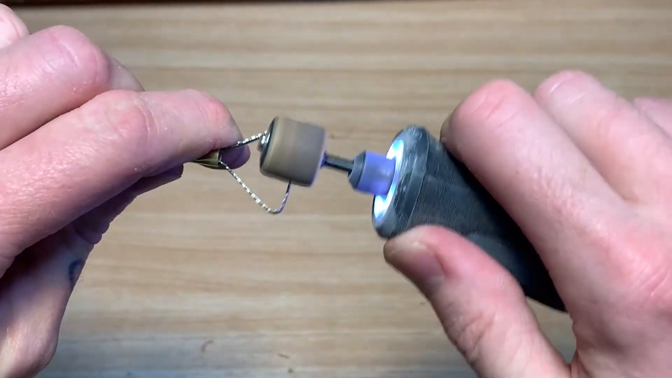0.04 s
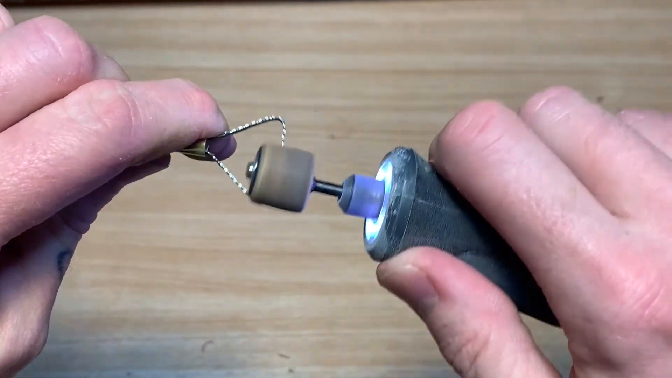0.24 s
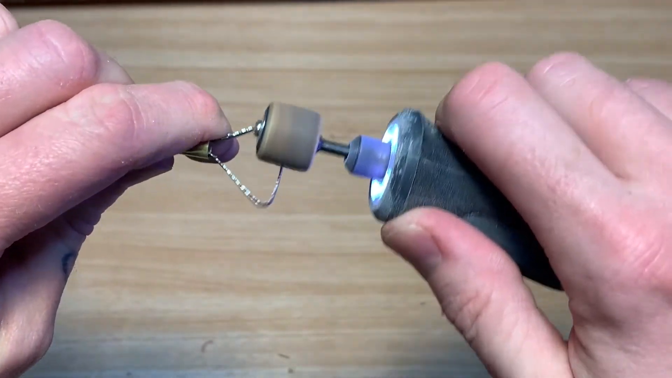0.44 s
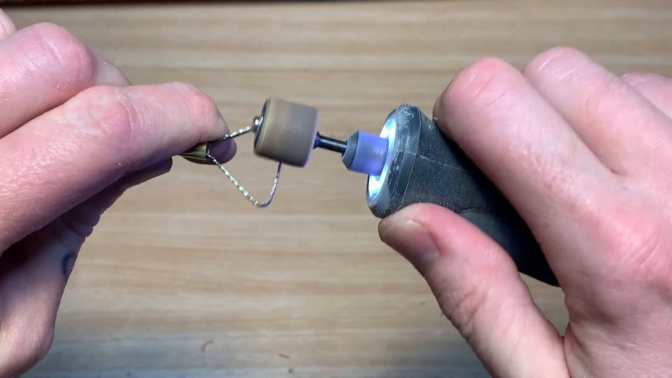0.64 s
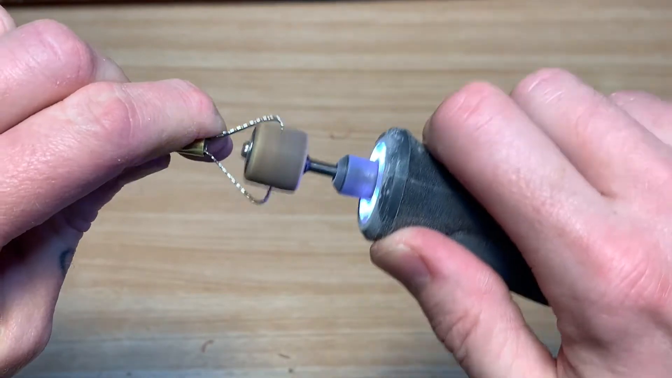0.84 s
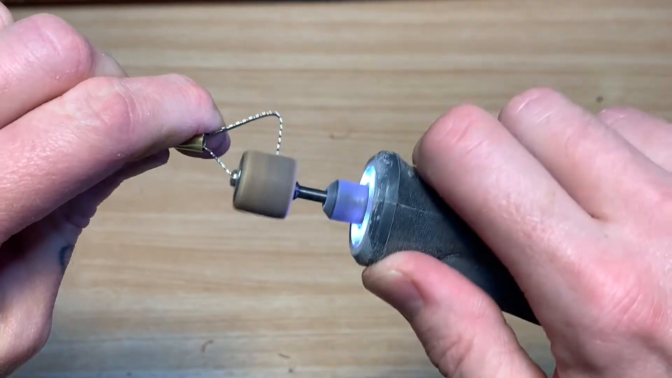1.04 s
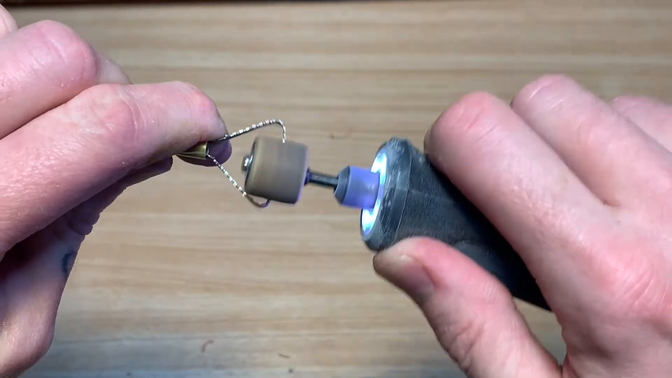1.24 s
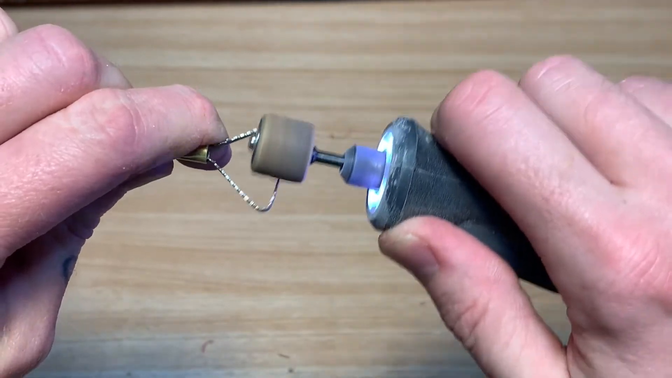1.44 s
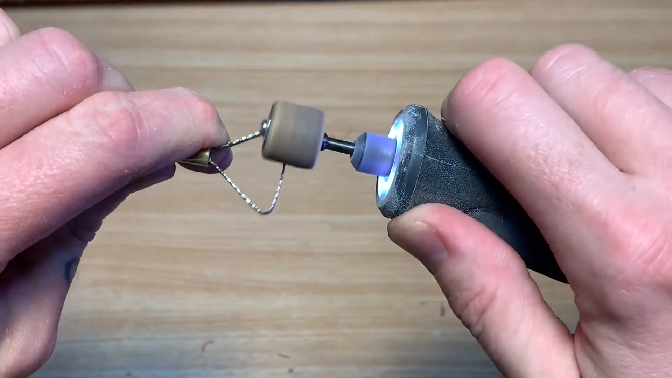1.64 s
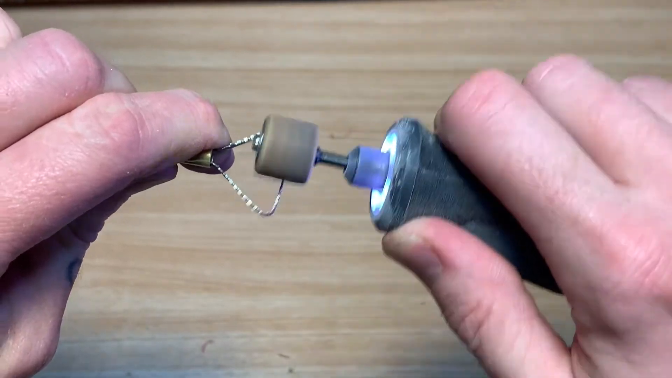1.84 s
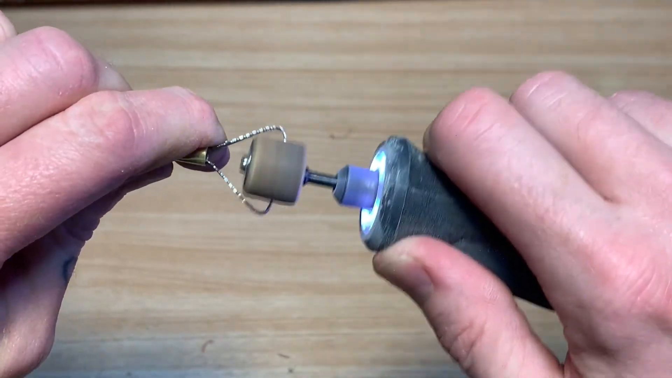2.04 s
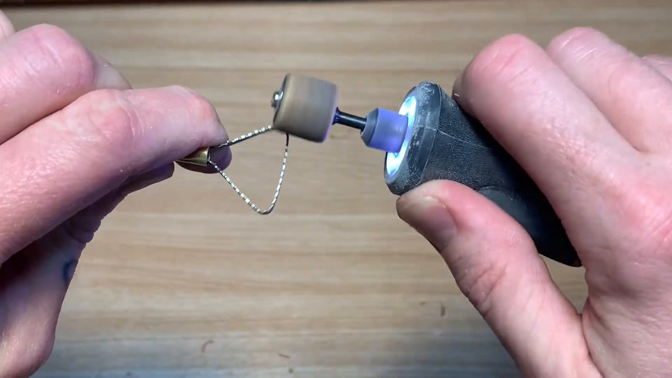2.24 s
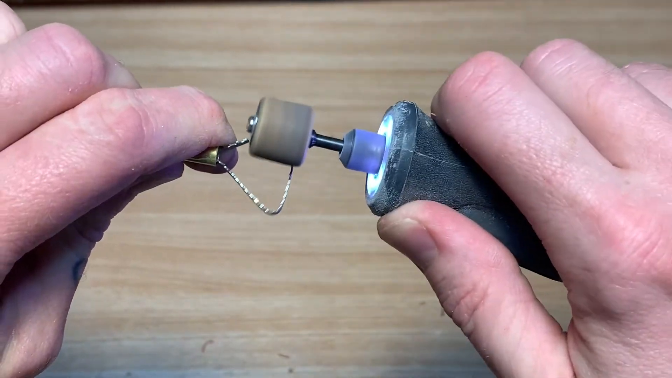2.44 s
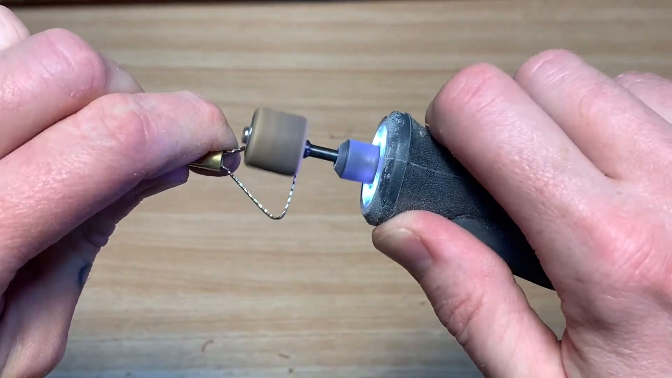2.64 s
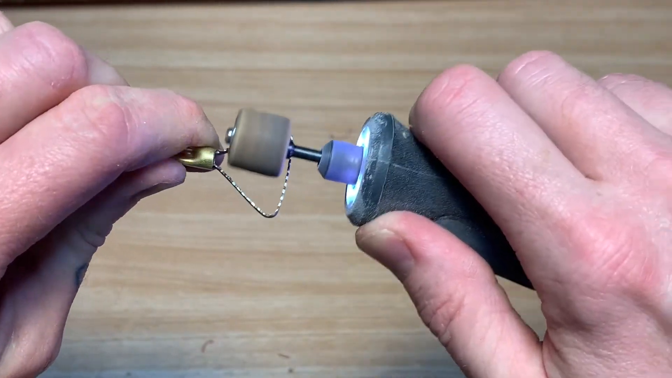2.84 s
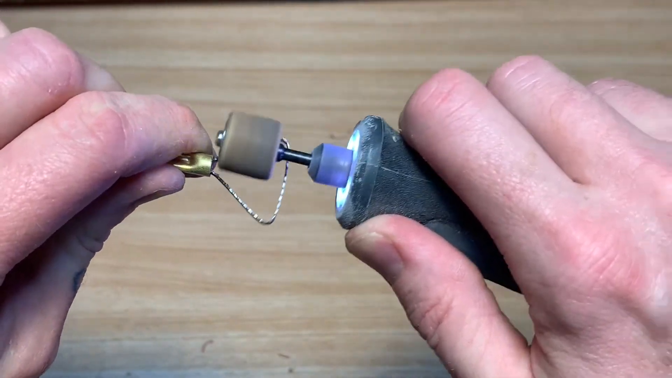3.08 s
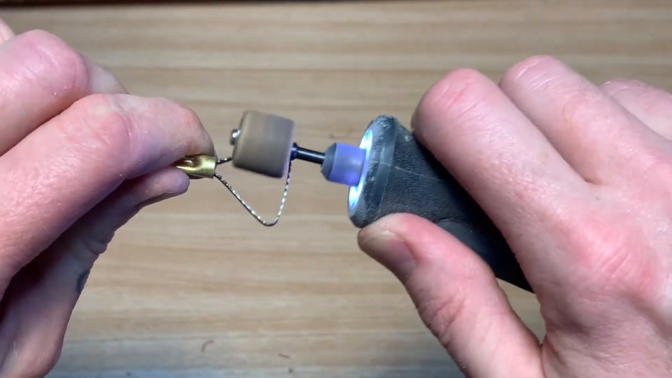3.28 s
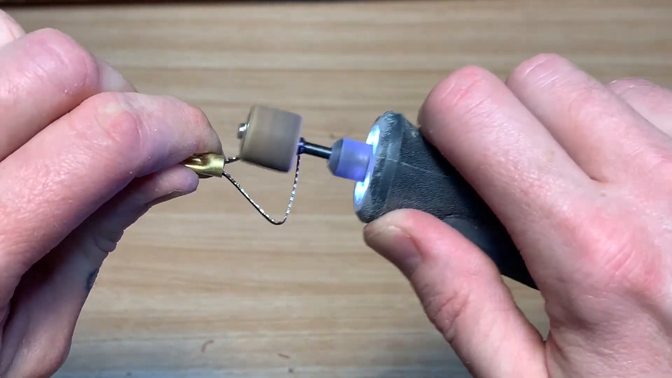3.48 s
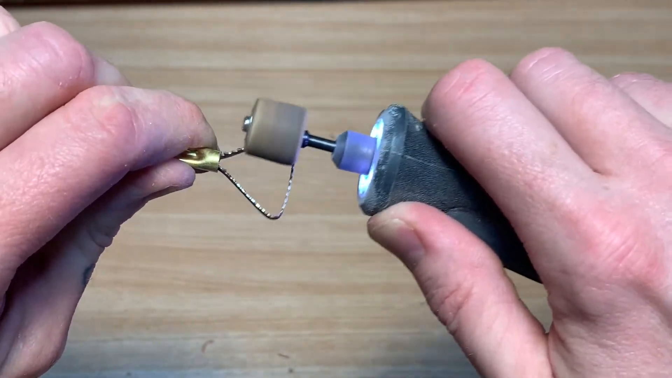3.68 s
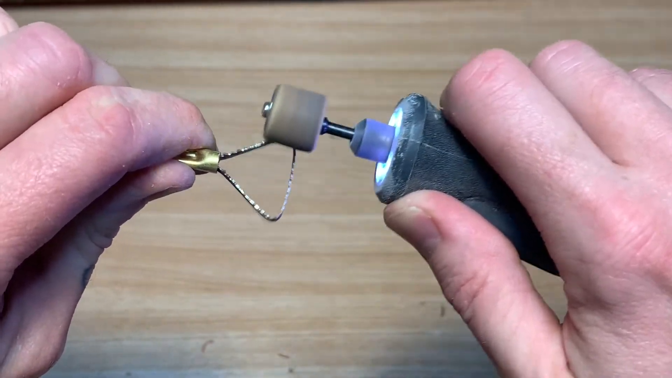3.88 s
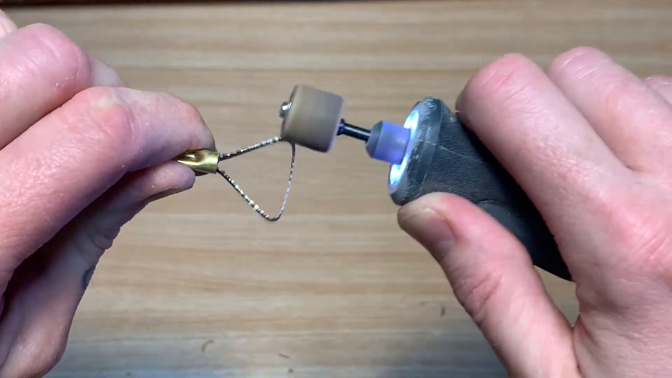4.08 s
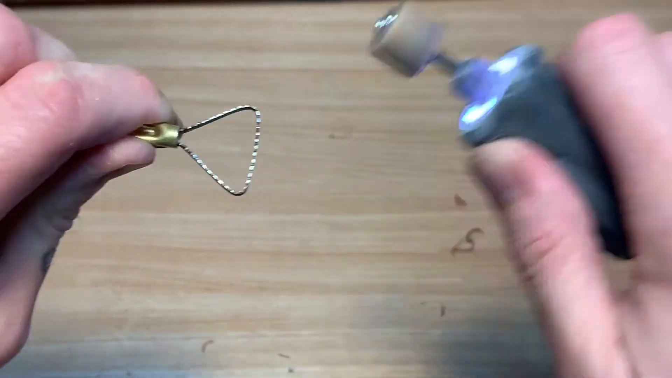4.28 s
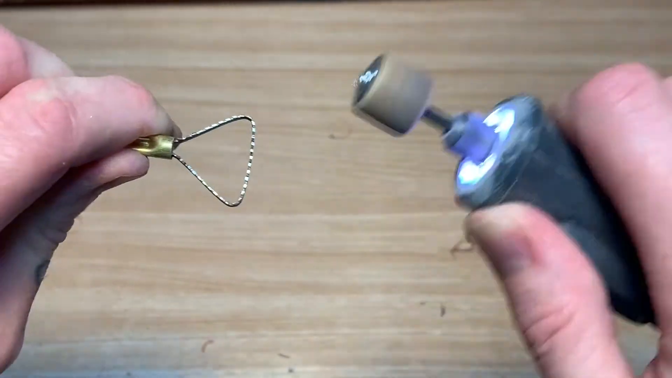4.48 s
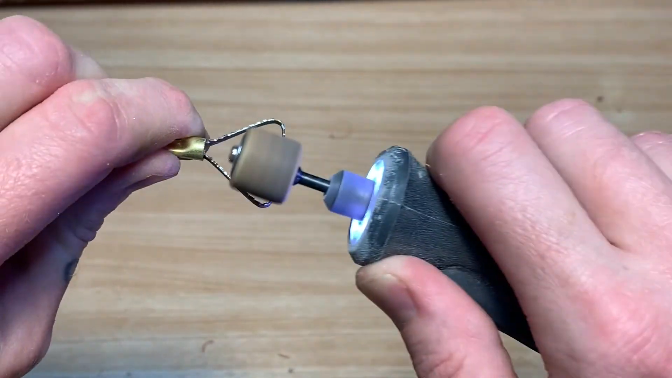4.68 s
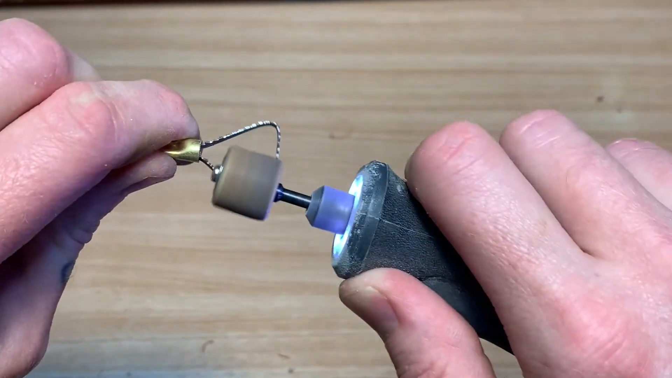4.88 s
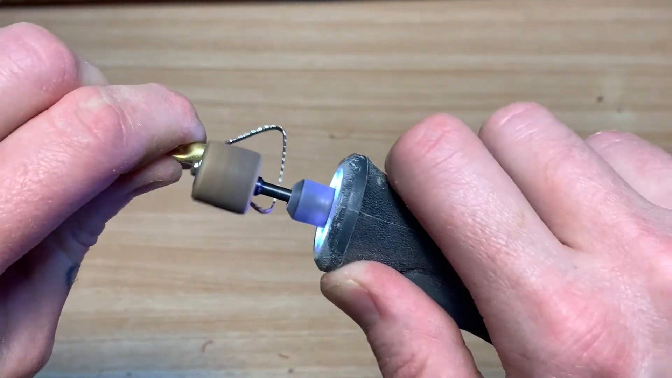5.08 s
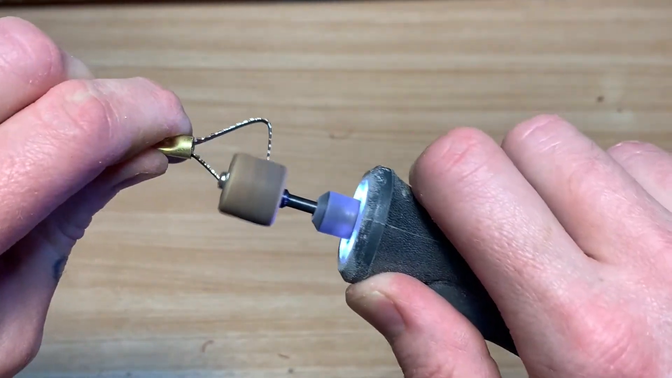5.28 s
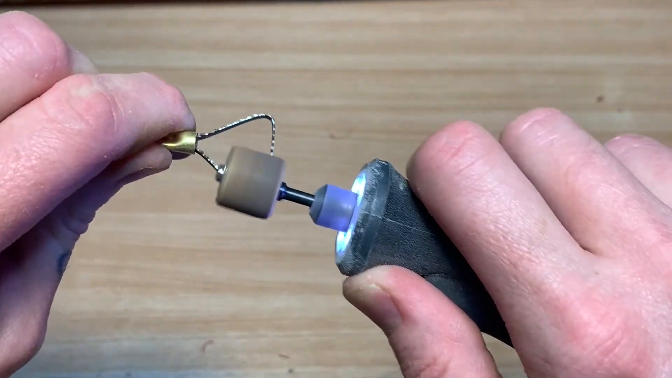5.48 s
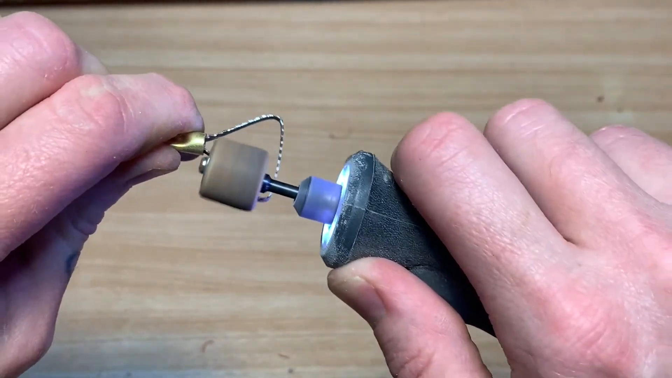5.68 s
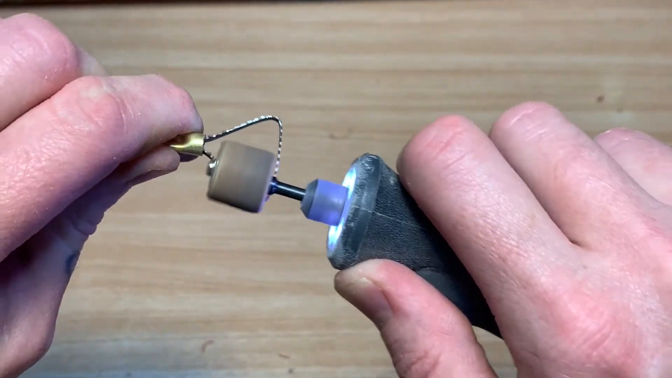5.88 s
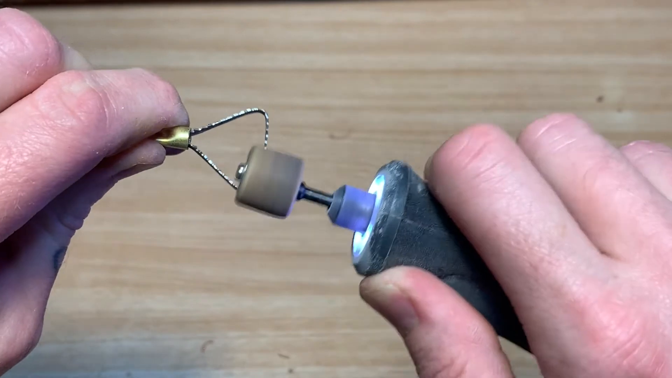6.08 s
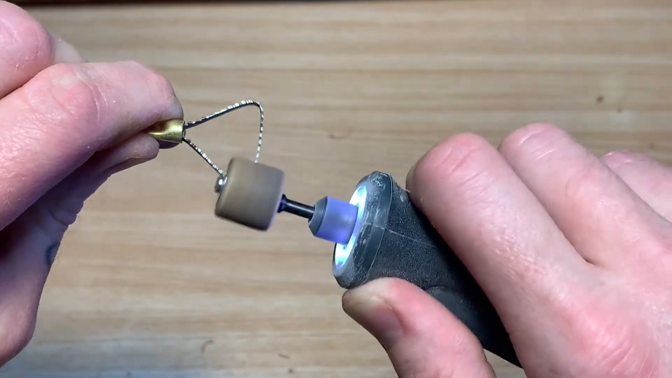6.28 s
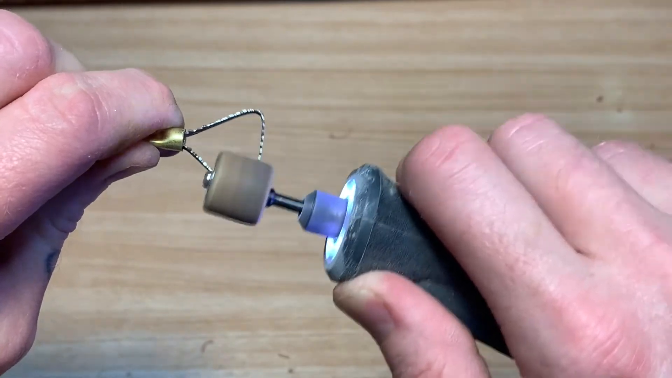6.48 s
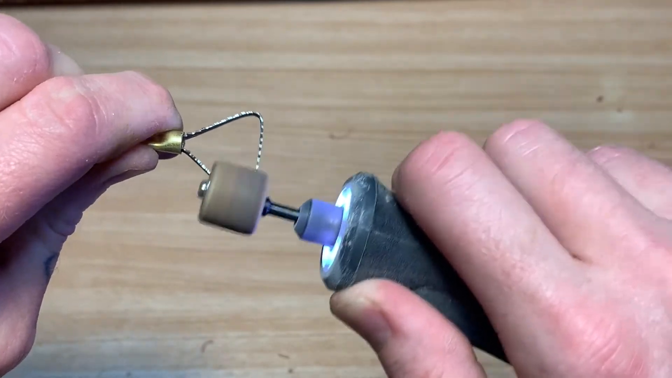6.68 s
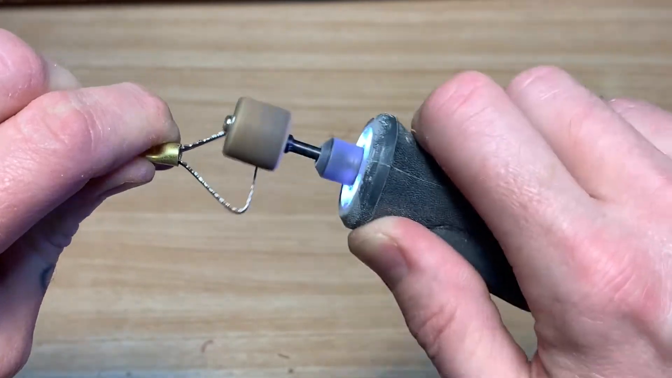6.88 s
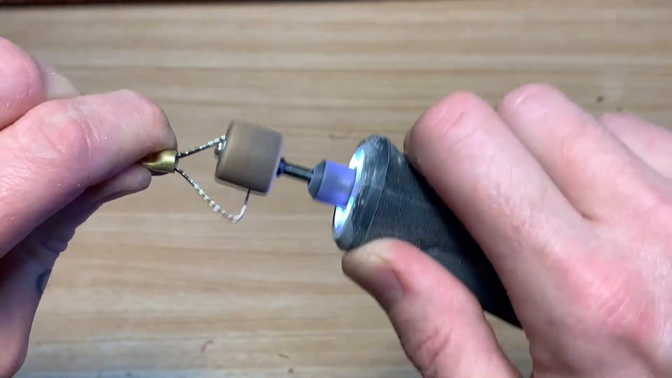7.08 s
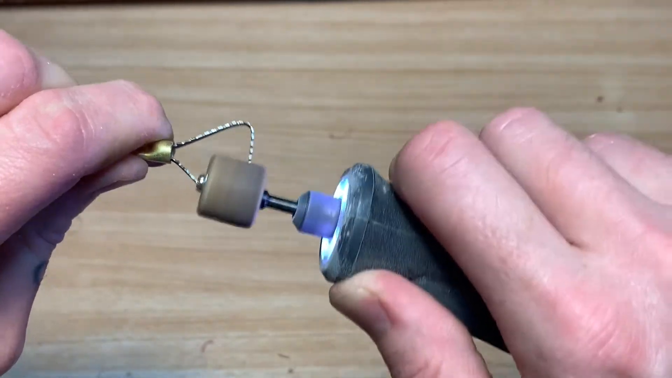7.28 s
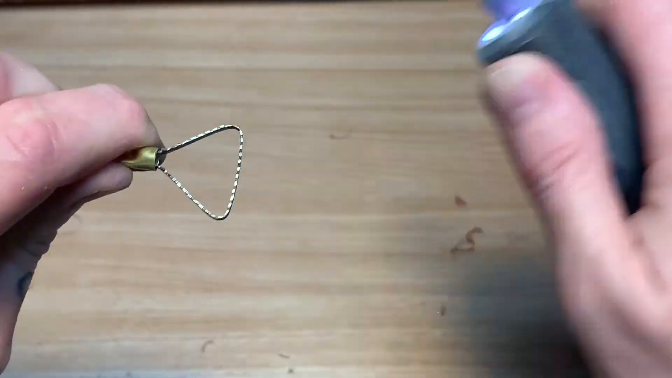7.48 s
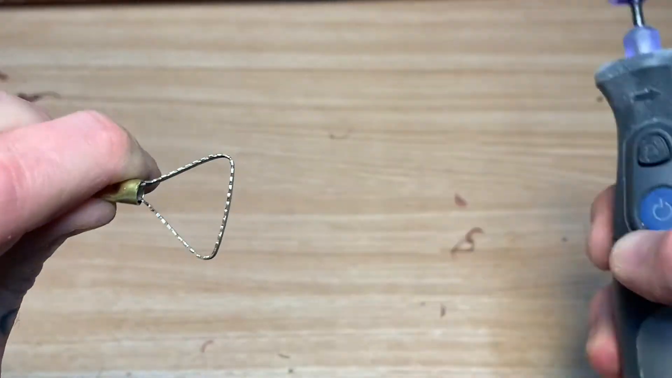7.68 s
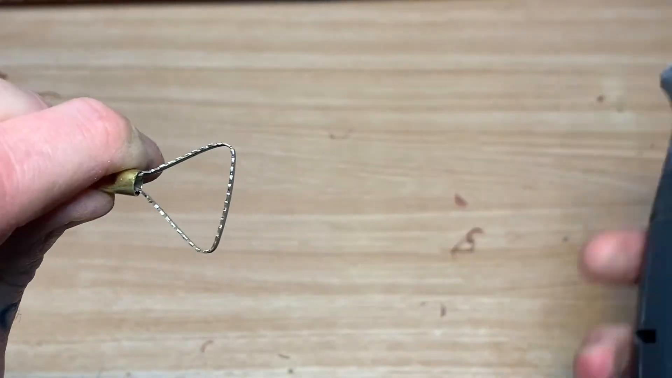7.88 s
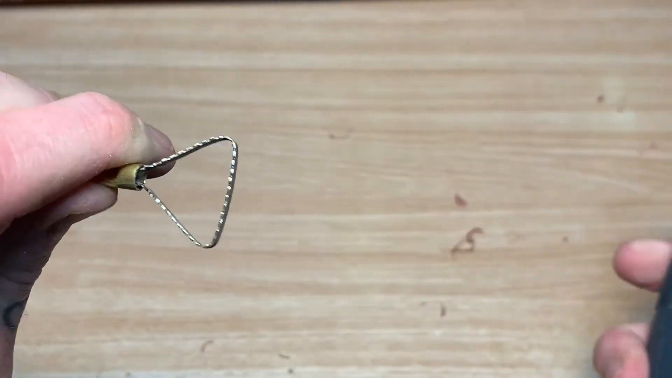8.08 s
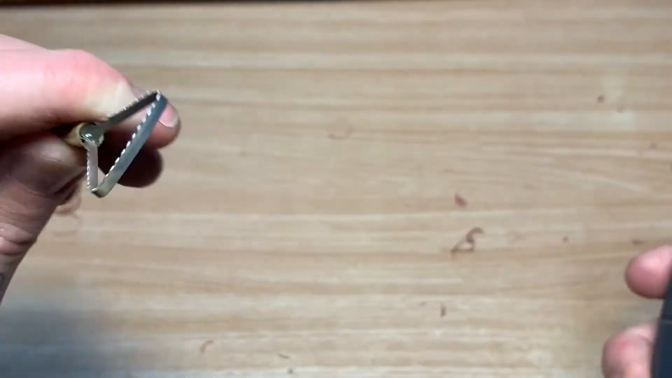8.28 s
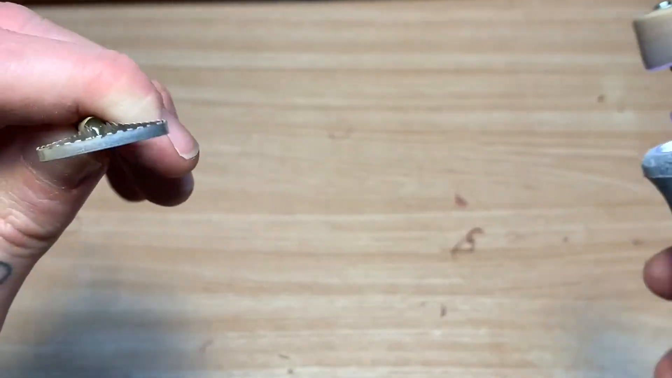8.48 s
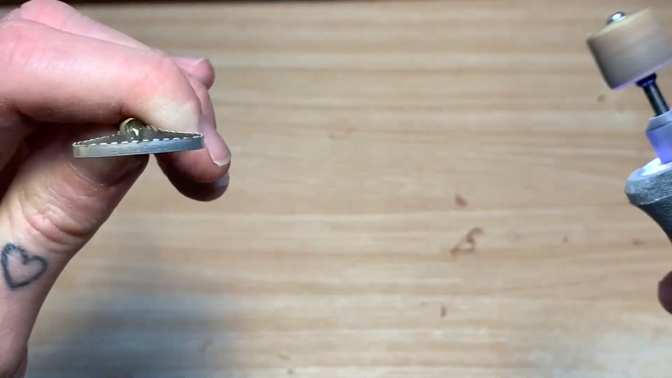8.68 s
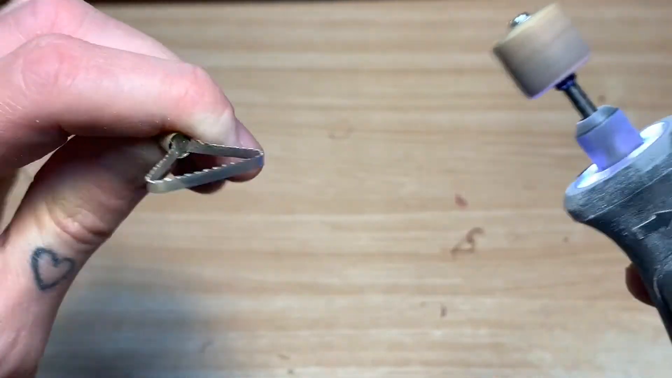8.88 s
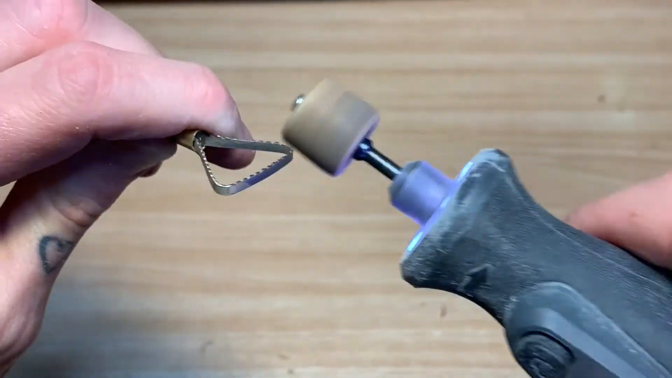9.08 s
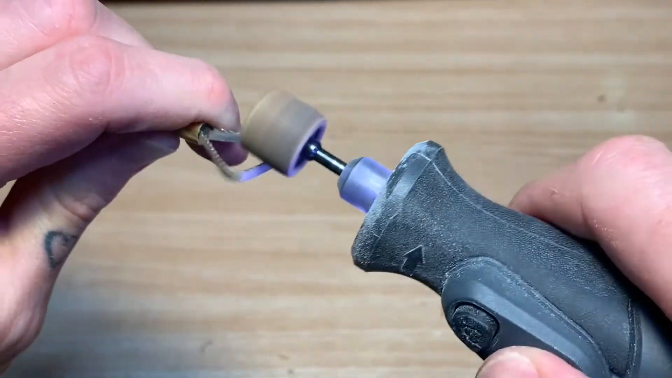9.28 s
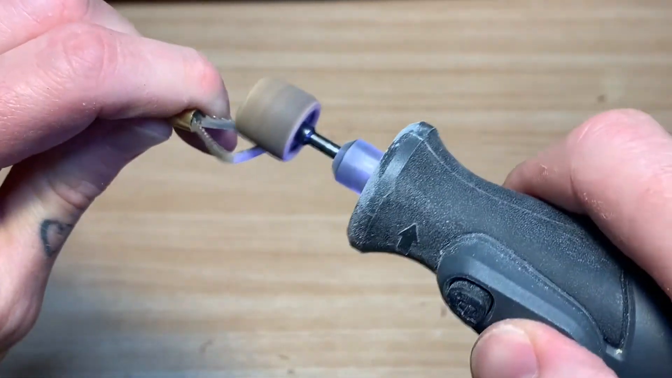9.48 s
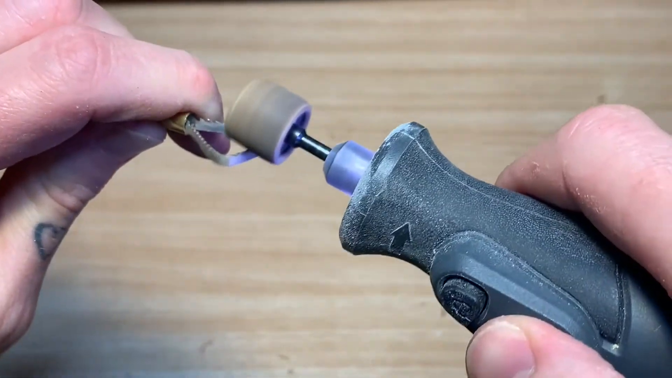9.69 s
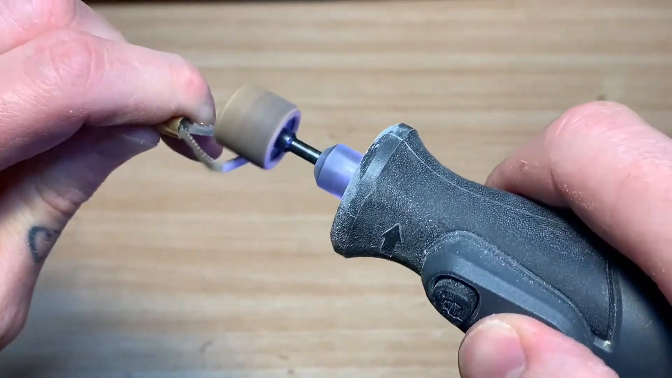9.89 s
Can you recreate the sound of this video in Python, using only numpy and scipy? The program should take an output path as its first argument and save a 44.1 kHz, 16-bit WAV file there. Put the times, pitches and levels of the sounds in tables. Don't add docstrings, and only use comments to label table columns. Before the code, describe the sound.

A small rotary tool whines and grinds a thin metal wire, bright and raspy, its pitch sagging under load and rising when lifted off.

```python
import sys
import numpy as np
from scipy import signal
from scipy.fft import rfft, irfft, next_fast_len
from scipy.io import wavfile
from scipy.ndimage import uniform_filter1d, map_coordinates

SR = 44100
rng = np.random.default_rng(int(sys.argv[2]) if len(sys.argv) > 2 else 0)


def put_to_file(sound):
    columns = np.atleast_2d(sound).T
    safe = np.clip(columns, -1, 1)
    whole_steps = np.round(safe * 32767)
    wavfile.write(sys.argv[1], SR, whole_steps.astype(np.int16))


def attenuation_scalar(level_db):
    decades = np.asarray(level_db, float) / 20
    return 10 ** decades


N = 438354

# [f/Hz, level/dB per Hz]
RUMBLE = [(13, -43), (22, 10), (54, 25), (107, 15.5), (157, 13), (238, 7), (309, 10), (371, 2.5),
          (420, 17.5), (550, -8), (920, -120)]
# [t/s, level/dB]
SWELLS = [(.05, 16), (.44, 17.5), (.85, 14.5), (1.5, 12.5), (2.11, 10.5), (2.45, 9.5), (2.7, 17),
          (3.12, 10), (4.12, 9), (4.57, 5), (5.33, 9), (5.9, 7), (6.2, 6), (6.799, 6), (7.95, 7), (8.35, 6),
          (8.55, 6), (8.89, 15), (9.2, 11.5), (9.48, 13)]
CALM_DB, SWELL_S = -67, 0.099
# [t/s, level/dB]
KNOCKS = [
    (0.19, -40),
    (2.701, -46),
    (7.901, -47),
    (8.299, -48),
    (8.847, -59),
    (9.498, -58),
]

# [t/s, goal/turns per s, lag/s]
LOADS = [(0, 146, .2), (.5, 140, .3), (2.1, 184, .13), (2.37, 156, .06), (3.302, 151, .3),
         (4.1, 145, 0.0486), (4.17, 154, 0.03004), (4.245, 208, .2), (4.805, 160, .04), (5.12, 156, .1),
         (6.07, 190, .12), (6.23, 157, .05), (6.9, 149, .3), (7.37, 212.2, .2), (9.266, 152, .115)]
START_TURNS, QUICK_SHARE, QUICK_S = 165, .22, 0.02964
# [t/s, gain/turns per s]
SURGES = [(0.031, -4), (0.202, -2.5), (0.418, 3.5), (.59, -5), (.68, 3.5), (.82, -7), (.93, 2), (1.06, -4),
          (1.201, 2), (1.3, -2), (1.452, 5), (1.579, -4), (1.69, 5), (1.8, -3), (1.929, 7), (2.201, -4),
          (2.52, -3), (2.798, 3), (2.95, -3.5), (3.041, 3), (3.152, -7), (3.3, -2.5), (3.558, -8),
          (3.772, -6), (4.138, 5.5), (5.199, -8), (5.5, -5), (5.62, 3), (5.801, -5), (6.149, -7.5),
          (6.271, 5), (6.439, 7), (6.55, -3), (6.649, 5.5), (6.768, -8), (7.06, -2.5), (7.17, 4.5),
          (7.3, -4.5), (7.5, -3), (9.412, 9), (9.672, -5), (9.76, 4)]
SURGE_S = .04
# [t/s, extra shudder level/dB]
ROCKS = [(0.036, 6), (.31, 4), (0.451, 4), (0.682, 3.5), (.95, 4), (1.22, 5.5), (1.578, 4), (1.71, 4),
         (1.85, 2), (2.0, 2), (2.652, 4), (2.858, 8), (3.092, 10), (3.3, 10.5), (3.532, 8.5), (3.728, 8.5),
         (3.98, 10), (4.11, 14), (5.081, 4), (5.39, 4.5), (5.6, 3), (5.88, 2.5), (6.62, 2.5), (6.93, 2),
         (9.332, 3), (9.579, 3.5)]
ROCK_S, ROCK_TURNS, ROCK_WHINE = .035, .3, 0.73

# [t/s, brush and whine level/dB, first order level/dB, shell ring level/dB, #
# loaded handle hum level/dB]
MOTOR = [(0, -47.5, -55, 9, -4.5), (1, -51, -55.5, 6.5, -7), (2.05, -51, -58, 5, -2.5),
         (2.3, -48, -68, 5, -6.5), (2.6, -48, -59.5, 8.5, -2.5), (4.1, -52.5, -62, 6, -9),
         (4.3, -49.5, -64, 9.5, -6.5), (4.5, -50, -57, 6, -2.5), (4.79, -49, -58, 19, -2.5),
         (4.9, -52, -64.5, -1.5, -14.5), (5.8, -57, -64.5, 2.5, -5), (6.2, -52, -70.5, 0, -7),
         (7.3, -52, -60.5, 11, -8.5), (7.75, -51, -52, 4, -11), (8.05, -48.5, -55.5, 33, -3),
         (8.6, -48, -48.5, 1.5, -2.5), (9.24, -45.5, -46, 20, -1), (9.5, -45, -72, 17, -7)]
# [t/s, centre f/Hz, lift level/dB, top orders level/dB]
HOUSING = [(0, 1770, 1.5, 8), (4.2, 2380, -2.5, 4.5), (4.4, 2700, 6, 4.5), (4.8, 2500, 2, 2.5),
           (5, 1900, 7.5, -3), (7.4, 960, -5.5, 7), (7.58, 2580, 4, 1.5), (7.8, 2000, 15, -7),
           (7.97, 2340, 8, -2), (8.28, 2360, 9.5, -1), (8.45, 1920, 3, 1), (8.9, 1900, 3, -11),
           (9.22, 1810, 2, -16), (9.4, 1730, -19, -3), (9.94, 1770, -13, -5)]
# [f/Hz, level/dB per Hz]
AIRFLOW = [(250, -15.3), (500, -17.3), (1000, -8.2), (1700, -5.2), (2600, -3.5), (4000, -5.2), (5500, -9.1),
           (7500, -0.5), (10000, -3.0), (13000, -5.5), (15500, -10.5)]
# [multiple of shaft speed, level/dB]
BEARING = [(3.5, -32), (4.5, -16.5), (7.5, -22), (11.5, -19), (13.5, -17), (15.5, -18)]
# [multiple of shaft speed, level/dB]
FREE_ORDERS = [(4, -11.5), (5, -3), (6, -4), (7, -1), (8, -10), (9, -6.0), (10, -6.5), (11, -4.5),
               (12, -21), (13, -3.5), (14, -2.5), (15, -3), (16, -13), (17, -5), (18, -20), (19, -15),
               (20, -18.5), (21, -17), (22, -14)]
# [multiple of shaft speed, level/dB]
LOADED_ORDERS = [(4, -16), (5, -16.5), (6, -20), (7, -16.5), (8, -18), (9, -6), (10, -16.5), (11, -8.5),
                 (12, -12.5), (13, -15), (14, -8)]
# [multiple, t/s, level/dB, half width/s]
BEAMS = [(5, 2.22, 6, 0.02), (5, 2.33, 3.5, 0.035), (4, 2.54, -9, .1), (11, 2.56, -8, .08),
         (10, 4.35, 3, .05), (12, 4.4, 8, .06), (11, 4.45, 6, .1), (16, 4.41, 10, .04),
         (6, 4.47, -18, 0.093), (4, 4.5, 7.5, 0.12), (9, 4.4, 4.5, .15), (14, 4.6, -10, .1),
         (17, 4.66, 4, 0.083), (15, 4.66, 3, 0.11), (18, 4.71, 4, .05), (10, 4.72, -12, .05),
         (5, 4.72, 2, .08), (5, 6.2, 2, 0.09), (5, 6.8, 9, .08), (10, 7.44, 12, .04), (13, 6.2, 6, .05),
         (2, 7.58, 12, .1), (5, 7.62, 3.5, 0.041), (4, 7.65, 13, 0.089), (9, 7.66, 7, 0.057),
         (11, 6.8, -12, 0.053), (13, 7.65, -11, .06), (3, 7.75, -7, 0.13), (5, 7.77, 8, 0.028),
         (8, 7.85, 0, 0.033), (5, 8, 8, 0.091), (11, 8.05, 6.5, 0.12), (10, 8.2, 12, 0.11),
         (12, 8.25, 17, .08), (9, 7.3, -12, 0.089), (5, 8.25, -18, 0.092), (15, 8.25, -8, .08),
         (17, 8.25, -4, 0.071), (7, 8.45, 5, 0.086), (20, 8.5, 6, .12), (6, 8.55, 10, 0.2),
         (9, 8.65, -8, .1), (11, 8.85, 6.5, 0.05), (9, 9.8, 8, .05), (13, 8.9, -12, 0.13),
         (20, 8.85, 11, 0.055), (8, 8.95, 2, 0.13), (17, 8.95, 5, .12), (4, 9.9, 5.5, 0.13)]
SECOND_DB, THIRD_DB = (-9.5, -6.5), (-1.5, 6)
TOP_ORDERS_HZ = 2894
PULSE_SPREAD = 1.5
WAVER_DB, DRIFT_DB, FLUTTER_DB = 2.5, 1.5, .13
LOADED_AIR_DB = -1
HANDLE_HZ, HANDLE_WIDTH_HZ, HANDLE_DB = 370, 140, 11.5
BRAKING = 150
COLLET_HZ, COLLET_WIDTH_HZ, COLLET_DB = 857, 92, 10
SHELL_HZ, SHELL_WIDTH_HZ = 1763, 96
SHELL_LAG, SHELL_LEAN_DB = 5.2, 2

# [start t/s, end t/s]
TOUCH_S = [
    (0, 2.242),
    (2.242, 2.637),
    (2.637, 4.238),
    (4.802, 4.806),
    (4.806, 6.216),
    (6.216, 7.385),
    (9.266, 10),
]
# [level/dB at start, level/dB at end]
TOUCH_DB = [(-22, -25.5), (-30, -30), (-24, -23), (-33, -38), (-26.5, -23), (-32.5, -28), (-28, -26.5)]
# [t/s, level/dB, half width/s]
PUSHES = [(.04, 0.5, 0.028), (.33, 2, 0.019), (1.05, 3, 0.016), (2.555, 5.5, 0.037), (2.72, -1, .02),
          (2.78, 2, 0.032), (.52, 1.5, 0.071), (1.3, 1.2, 0.032), (1.55, 1, 0.043), (3.33, 0.5, 0.017),
          (3.55, 0.5, .02), (3.8, 2, 0.029), (5.1, 1, .03), (5.98, 2, 0.032), (6.6, -1, 0.028),
          (6.83, -1, 0.036), (9.28, 0.5, 0.0055), (9.5, -1, .04), (9.76, 0.5, 0.034), (9.93, 1, 0.02),
          (6.385, -0.5, 0.035), (3.1, 3, 0.089), (4.05, -6, 0.0053), (4.14, 9.5, 0.015), (4.21, -5.5, 0.12),
          (4.83, 10.5, 0.046), (4.965, 3.5, 0.0067), (5.17, 4.5, 0.036), (5.34, 3, 0.013), (5.43, 2, 0.016),
          (5.48, 1, 0.035), (2.652, 1.5, 0.014), (5.72, 2, 0.064), (6.29, 7.5, 0.035), (6.505, 8.5, 0.033),
          (6.72, 8.5, 0.029), (7.27, 2, 0.051), (7.355, -3.5, 0.031), (9.3, 4, 0.039)]
# [bite t/s, level lost/dB, easing/s]
EASES = [(.21, 2.5, 0.032), (0.909, 1.5, 0.12), (1.17, 5, 0.054), (1.43, 3, 0.068), (1.67, 2.5, 0.043),
         (2.24, 23, 0.089), (2.35, 5, 0.086), (2.637, 3.5, 0.074), (2.704, 7, 0.077), (2.93, 2.5, 0.14),
         (3.26, 0.5, .05), (4.92, 7, 0.11), (5.017, 6, 0.04), (5.25, 4, 0.071), (5.62, 5.5, 0.13),
         (5.876, 9, 0.089), (6.217, 32.5, 0.18), (9.44, 4, 0.18), (9.73, 3, 0.044), (9.91, 3, 0.065)]
BITE_S, TREMBLE_DB = 0.005, 0.25
SPOT_TIMES = [
    2.55,
    4.5,
    8.5,
]
# [f/Hz, width/Hz, then level/dB at each of the four spots]
WIRE_MODES = [(4367, 140, -10.5, -25, -37, -4), (5284, 200, -21, -27, -33, 0.5),
              (6030, 540, -2, -15, -19.5, -5.5), (6446, 600, -4.5, -6, -12, -4.5),
              (7173, 460, -2, 1.5, -5.5, -4.5), (7590, 690, -2.5, 3, -3.5, -2.5),
              (8293, 870, 1, 2.5, -4, 0), (8523, 440, 2.5, 2, 1.5, 6), (9180, 520, 3.5, -5, -17, 3),
              (10080, 690, 2.5, -5, -9.5, -2.5), (10540, 450, -0.5, 4, 3.5, -3.5),
              (10900, 360, -8.5, -23, -15, -3), (11210, 520, -18, -6, 2.5, -28),
              (11400, 650, -1, -4, -11, 2.5), (11970, 420, -5.5, -24, 3, 2),
              (12730, 1130, -6.5, -6.5, -5.5, -0.5), (13580, 550, -1.5, 1.5, 1, 1),
              (14200, 370, -4.5, -7.5, 0.5, -14), (14870, 730, -4, 1, 1, -2),
              (15850, 1100, 11.5, 6.5, -7.5, 2)]
# [dull scrape level/dB, extra level/dB of the lower wire modes]
GRIP = [(-50.5, -1.5), (-56, -2.5), (-59.5, 2), (-58.5, -1.5)]
# [f/Hz, level/dB]
GRIT = [(3000, -28), (4500, -24), (6000, -14), (9000, -10), (15500, -10)]
# [f/Hz, level/dB]
SCRAPE = [(150, -81), (400, -44), (1000, -35.5), (2000, 1), (3500, -4.5), (5500, 0.5), (8000, -24)]
# [f/Hz,
# width/Hz, level/dB]
SWAY_MODES = [(820, 230, -18), (1372, 25, 26), (1714.5, 17.4, 22), (2064, 190, 2), (2756, 390, 8),
              (3530, 130, 0), (4422, 80, 15.5)]
WIRE_ABOVE_HZ = 2660
SHUDDER_HZ, SHUDDER_ABOVE = 1900, .35

# [t/s, delay/samples]
LAG = [(0, 7.1), (4.15, 9.35), (4.4, 10.7), (4.8, 8.9), (7.3, 9.14), (7.8, 12.1), (8.3, 11.8), (8.5, 11.3),
       (9.2, 15.4), (9.3, 5.7), (9.94, 6.8)]
# [f/Hz, level/dB]
LEAN = [(100, 11.5), (200, -1.5), (700, -5.5), (1500, -2), (2800, 0.5), (5000, 4), (6500, 0.5)]
# [f/Hz, likeness 0 to 1]
ALIKE = [(100, .97), (600, .9), (2200, .65), (2600, .82), (2850, .97), (3100, .85), (3700, .45), (4700, .4),
         (6500, .75), (8500, .96), (9500, .985), (15000, .93)]
# [f/Hz, phase/rad]
BEHIND = [(4700, .7), (7000, .7), (8600, 2.4), (9450, 3.14), (10300, 3.85), (12000, 5.55), (13200, 6.28),
          (14400, 6.95), (15800, 9)]
CEILING = .75
# [f/Hz, level/dB re mean]
MASKED = [(1750, -40), (2000, -13), (2200, -18), (2450, -26), (2750, -11), (3000, -19), (3300, -16),
          (3600, -24), (3900, -13), (4300, -24), (4750, -11), (5100, -22), (6000, -10), (8000, 10)]
# [f/Hz, level/dB re mean]
MASKED_TURNED = [(2400, -40), (2800, -23), (3050, -17), (3350, -6), (3700, -12), (4000, -28), (5300, -34),
                 (6000, -10), (8000, 10)]
TURNED_S, FICKLE_DB = 9.26, 2.5
JOLTS_S = [
    2.225,
    2.935,
    4.25,
    6.2,
    6.59,
    7.385,
    9.262,
]


def unit(x):
    return x / np.sqrt(np.mean(x ** 2) + 1e-20)


def along(points, hz):
    f, v = np.transpose(points)
    return np.interp(np.log(hz + 1), np.log(f + 1), v)


def curves(rows):
    s, *cols = np.transpose(rows)
    return [np.interp(np.arange(N) / SR, s, c) for c in cols]


def wobble(rate):
    return map_coordinates(rng.standard_normal(int(N * rate / SR) + 4), [np.arange(N) * rate / SR])


def bumps(rows):
    t = np.arange(0, N + 32, 32) / SR
    humps = (height * np.exp(-.5 * ((t - s) / width) ** 2) for s, height, width in rows)
    return np.interp(np.arange(N) / SR, t, sum(humps, 0 * t))


def filtered(x, response):
    m = next_fast_len(N + 8192)
    return irfft(rfft(x, m) * response(np.fft.rfftfreq(m, 1 / SR)), m)[..., :N]


def scattered(x, reach_s):
    t = np.arange(2048) / SR
    echo = rng.standard_normal(2048) * attenuation_scalar(-60 * t / reach_s)
    return signal.fftconvolve(x, echo / np.linalg.norm(echo))[:N]


def through_bench(x):
    return 8 * filtered(x, lambda hz: 1 / (1 + (hz / 330) ** 6) / (1 + (50 / (hz + 1)) ** 4))


def room():
    a, b, c = rng.standard_normal((3, N))
    hum = unit(filtered(c, lambda hz: 1 / (1 + ((hz - 74) / 4) ** 2)))
    rumble = lambda hz: attenuation_scalar(along(RUMBLE, hz)) / (1 + (38 / (hz + 1)) ** 6)
    mid, side = filtered(np.array([a, .14 * b]), rumble)
    air = np.array([mid + side, mid - side]) / np.std(mid) + 0.69 * hum
    air_db = CALM_DB + bumps([(s, db, SWELL_S) for s, db in SWELLS]) - 3.0
    t = np.arange(SR // 4) / SR
    knocks = np.zeros(N + SR)
    for s, db in KNOCKS:
        envelope = attenuation_scalar(db - 60 * t / 0.16) * (1 - np.exp(-t / 0.01))
        knocks[round(s * SR):][:len(t)] += envelope * rng.standard_normal(len(t))
    return attenuation_scalar(air_db) * air + through_bench(knocks[:N])


def shaft(rock_db):
    speed, now = np.zeros(N), START_TURNS
    ends = [row[0] for row in LOADS[1:]] + [N / SR]
    for (s, goal, lag), end in zip(LOADS, ends):
        first, last = round(s * SR), round(end * SR)
        t = np.arange(last - first) / SR
        approach = QUICK_SHARE * np.exp(-t / QUICK_S) + (1 - QUICK_SHARE) * np.exp(-t / lag)
        part = goal + (now - goal) * approach
        speed[first:last], now = part, part[-1]
    return speed + ROCK_TURNS * rock_db + bumps([(s, gain, SURGE_S) for s, gain in SURGES])


def beam(order):
    return bumps([row[1:] for row in BEAMS if round(row[0]) == order])


def motor(speed, turn, rock_db):
    brush_db, first_db, shell_db, handle_db = curves(MOTOR)
    housing_hz, lift_db, top_db = curves(HOUSING)
    braking = np.clip(-np.gradient(speed) * SR / BRAKING, 0, 1) * np.clip((speed - 160) / 10, 0, 1)
    free = np.clip((speed - 165) / 27, 0, 1) * (1 - 1.1 * braking)
    loaded = 1 - free
    resonance = lambda hz, centre, width: np.exp(-((hz - centre) / width) ** 2)
    flicker = lambda: attenuation_scalar(loaded * 2.8 * wobble(9))

    def low_order_db(loaded_db, free_db):
        return (brush_db + (1 - free ** 2) * (loaded_db + handle_db)
                + free ** 2 * (free_db + np.minimum(handle_db, 0)))

    boom_db = braking * HANDLE_DB * resonance(2 * speed, HANDLE_HZ, HANDLE_WIDTH_HZ)
    second_db = low_order_db(*SECOND_DB) + boom_db + beam(order=2)
    third_db = low_order_db(*THIRD_DB) + beam(order=3)
    low_dbs = [db + loaded * WAVER_DB * wobble(14) for db in (first_db, second_db, third_db)]
    brush_db = brush_db + ROCK_WHINE * rock_db

    shake = turn + loaded * (.04 * wobble(40) + .15 * wobble(8)) + .008 * wobble(40)
    lows = np.zeros(N)
    for k, db in enumerate(low_dbs, 1):
        lows += attenuation_scalar(db - 0.5) * flicker() * np.cos(k * shake)
    lines, shell = np.zeros((2, N))
    for k, free_db in FREE_ORDERS:
        hz = k * speed
        level_db = free * free_db + loaded * (dict(LOADED_ORDERS).get(k, -16) + 0.51)
        level_db += lift_db * resonance(hz, housing_hz, 400) + top_db * (hz > TOP_ORDERS_HZ)
        level_db += (1 - free ** 2) * COLLET_DB * resonance(hz, COLLET_HZ, COLLET_WIDTH_HZ)
        level_db += beam(order=k) + DRIFT_DB * wobble(2.793) + k * FLUTTER_DB * wobble(7.6)
        phase = rng.uniform(0, PULSE_SPREAD) * (3 - 2 * free)
        line = attenuation_scalar(level_db) * flicker() * np.cos(k * shake + phase)
        lines += line
        shell += line * (attenuation_scalar(shell_db * resonance(hz, SHELL_HZ, SHELL_WIDTH_HZ)) - 1)
    for k, db in BEARING:
        lines += free * attenuation_scalar(db + 7.3 * wobble(2.95)) * np.sin(k * shake)

    pulse_db = 1.3 * np.cos(turn) + 2.0 * np.cos(2 * turn + 0.48) + 2.6 * np.cos(3 * turn + 1.6)
    pulse = attenuation_scalar(pulse_db + 0.85 * wobble(11))
    airflow = lambda hz: attenuation_scalar(along(AIRFLOW, hz)) / (1 + (330 / (hz + 1)) ** 4)
    brush = unit(filtered(pulse * rng.standard_normal(N), airflow))
    brush = attenuation_scalar(brush_db + 9 + loaded * LOADED_AIR_DB) * brush
    return brush, lows + attenuation_scalar(brush_db + 1) * lines, attenuation_scalar(brush_db + 1) * (1 - braking) * shell


def pressure():
    t = np.arange(N) / SR
    press = np.zeros(N)
    for (s, end), (db0, db1) in zip(TOUCH_S, TOUCH_DB):
        press += (t >= s) * (t < end) * attenuation_scalar(np.interp(t, [s, end], [db0, db1]))
    ease_db = sum(np.interp(t, [s - long, s - BITE_S, s], [0, db, 0]) for s, db, long in EASES)
    return uniform_filter1d(press * attenuation_scalar(bumps(PUSHES) - ease_db + TREMBLE_DB * wobble(9.6)), size=90)


def grinding(turn, rock_db):
    press = pressure()
    spot = np.searchsorted(SPOT_TIMES, np.arange(N) / SR)
    drag_db, weight_db = np.array(GRIP)[spot].T
    angle = turn + 0.44 * wobble(5.1)
    bump = np.sin(angle) + 0.26 * np.sin(2 * angle) + 0.11 * np.sin(3 * angle)
    runout_db = np.clip(4.34 + 2 * wobble(8.5), 0, 7) * bump + 1 * wobble(150)
    runout = attenuation_scalar(runout_db) / np.sqrt(uniform_filter1d(attenuation_scalar(2 * runout_db), size=900))
    grain_db = 2.2 * rng.standard_normal(N) + 0.75 * wobble(25)
    force = unit(runout * rng.standard_normal(N) * attenuation_scalar(grain_db))

    def mode(f, hz, width):
        return 1j * f * width / (hz * hz - f * f + 1j * f * width)

    def ring(f, i, numbers):
        total = 0
        for k in numbers:
            hz, width, *levels_db = WIRE_MODES[k]
            both = mode(f, hz, .55 * width) + .8 * mode(f, hz, width / 6)
            total = total + (-1) ** min(k, 10) * attenuation_scalar(levels_db[i]) * both
        return total

    wire = np.zeros(N)
    for i in range(len(SPOT_TIMES) + 1):
        here = force * press * (spot == i)
        wire += filtered(here * attenuation_scalar(weight_db), lambda f: ring(f, i, range(10)))
        wire += filtered(here, lambda f: ring(f, i, range(10, len(WIRE_MODES))))
    grit = filtered(force[::-1] * press, lambda f: attenuation_scalar(along(GRIT, f)))
    wire = filtered(wire + grit, lambda f: 1 / (1 + (WIRE_ABOVE_HZ / (f + 1)) ** 4))

    sway = lambda f: sum(attenuation_scalar(db) * mode(f, hz, width) for hz, width, db in SWAY_MODES)
    shudder = lambda f: attenuation_scalar(along(SCRAPE, f)) * (0.77 + np.abs(sway(f)))
    scrape = unit(filtered(rng.standard_normal(N) * attenuation_scalar(0.53 * runout_db), shudder))
    dull = filtered(scrape, lambda f: 1 / (1 + (f / SHUDDER_HZ) ** 6))
    scrape = attenuation_scalar(rock_db) * dull + attenuation_scalar(SHUDDER_ABOVE * rock_db) * (scrape - dull)
    touching = press ** 2 / (press ** 2 + attenuation_scalar(-84))
    return attenuation_scalar(5.0) * wire + attenuation_scalar(drag_db + 8.0) * touching * scrape


def ports(x, whine):
    mixing = lambda hz: np.arccos(np.clip(along(ALIKE, hz), 0, 1)) / 2
    lean = lambda hz: attenuation_scalar(along(LEAN, hz) * np.array([[.5], [-.5]]))
    shares = np.array([wobble(20) for _ in range(6)])
    shares = shares / np.linalg.norm(shares, axis=0)
    echo = 1.74 * sum(share * scattered(x, reach_s=0.066) for share in shares)
    split = lambda hz: np.array([np.cos(mixing(hz)), np.sin(mixing(hz))])
    direct, echo = filtered(np.array([x, echo]), split)
    direct = direct + whine
    pair = filtered(np.array([direct + echo, direct - echo]), lean)
    lows = filtered(pair, lambda hz: 1 / (1 + (hz / 4700) ** 60))
    highs = pair - lows
    lows[0] = map_coordinates(lows[0], [np.arange(N) - curves(LAG)[0]])
    highs[1] = filtered(highs[1], lambda hz: np.exp(-1j * along(BEHIND, hz)))
    return lows + highs


def thrifty(dry, under_db, valley_db, top_hz):
    sum_and_difference = np.array([dry[0] + dry[1], dry[0] - dry[1]]) / 2
    hz, t, z = signal.stft(sum_and_difference, SR, nperseg=2048)
    band = np.floor(40 * np.log(1 + hz / 3000)).astype(int)
    starts = np.flatnonzero(np.diff(band, prepend=-1))
    density = np.abs(z) ** 2
    power = (np.add.reduceat(density, starts, axis=1) / np.bincount(band)[:, None])[:, band]
    lasting = uniform_filter1d(power, size=3, axis=2)
    margin_db = np.where(hz < 5200, [[2], [-20]], under_db)
    weaker = lasting < lasting[::-1] * attenuation_scalar(2 * margin_db)[..., None]
    before = t < TURNED_S
    limit_db = np.where(before, along(MASKED, hz)[:, None], along(MASKED_TURNED, hz)[:, None])
    fickle = unit(uniform_filter1d(rng.standard_normal((len(starts), len(t))), size=3))[band]
    faint = power < density.mean((0, 1)) * attenuation_scalar(2 * (limit_db + FICKLE_DB * fickle))
    jolt = np.abs(t[:, None] - JOLTS_S).min(axis=1) < .02
    valley = power < uniform_filter1d(power, size=60, axis=1) * attenuation_scalar(2 * valley_db)
    valley &= hz[:, None] > np.where(before, 3000, 5600)
    edge_hz = top_hz - 220 * rng.exponential(size=(2, 1, z.shape[2]))
    keep = (~(weaker & faint | valley) | jolt) & (hz[:, None] < edge_hz)
    mid, side = signal.istft(z * keep, SR, nperseg=2048)[1][:, :N]
    return np.array([mid + side, mid - side])


def scene():
    rock_db = bumps([(s, db, ROCK_S) for s, db in ROCKS])
    speed = shaft(rock_db)
    turn = 2 * np.pi * np.cumsum(speed) / SR
    brush, whine, shell = motor(speed, turn, rock_db)
    late_shell = map_coordinates(shell, [np.arange(N) - SHELL_LAG])
    shell = np.array([attenuation_scalar(SHELL_LEAN_DB) * late_shell, shell])
    return ports(brush + grinding(turn, rock_db), whine) + shell + room()


def roll_off(x):
    return signal.sosfilt(signal.butter(12, 16330, fs=SR, output="sos"), x)


def record(dry):
    dry = dry / (1 + np.abs(dry / CEILING) ** 4) ** .25
    mix = thrifty(dry, under_db=-5, valley_db=-4.8, top_hz=15830)
    return roll_off(mix)


dry = scene()
out = record(dry)
put_to_file(out)
```